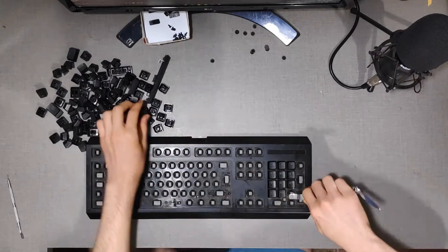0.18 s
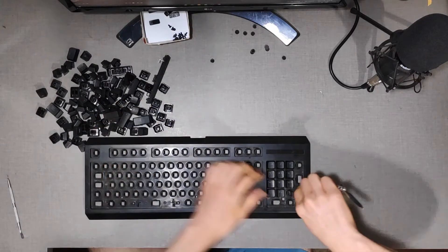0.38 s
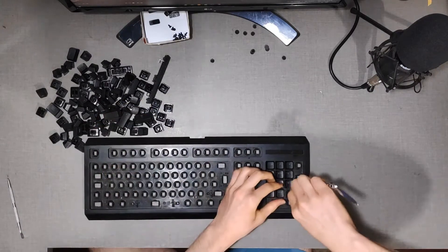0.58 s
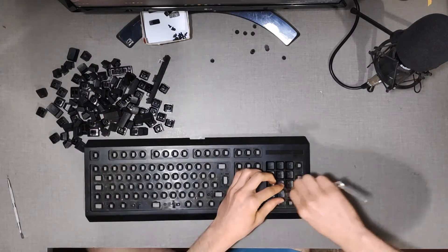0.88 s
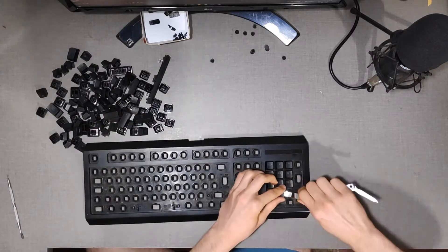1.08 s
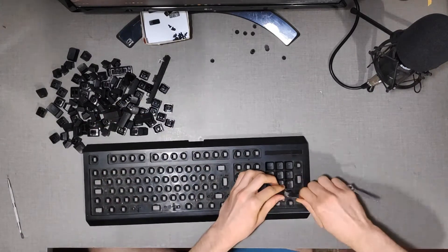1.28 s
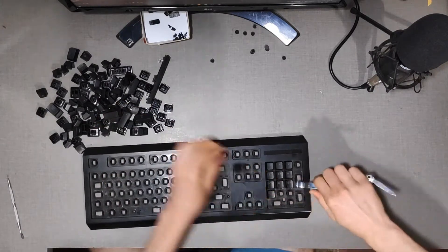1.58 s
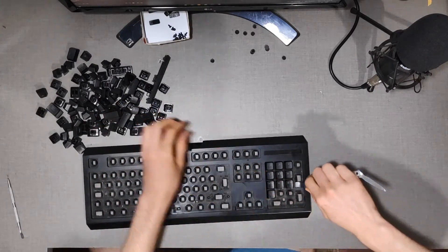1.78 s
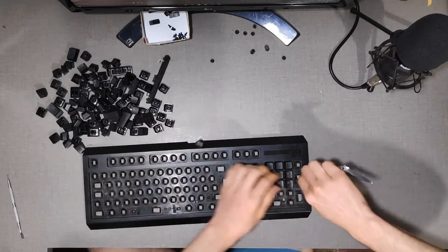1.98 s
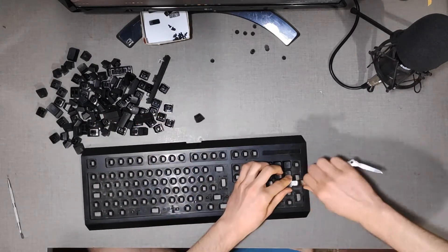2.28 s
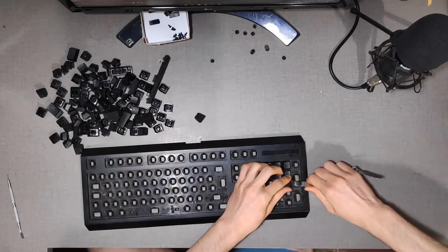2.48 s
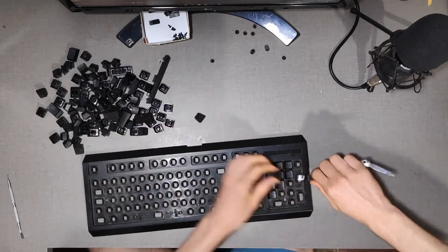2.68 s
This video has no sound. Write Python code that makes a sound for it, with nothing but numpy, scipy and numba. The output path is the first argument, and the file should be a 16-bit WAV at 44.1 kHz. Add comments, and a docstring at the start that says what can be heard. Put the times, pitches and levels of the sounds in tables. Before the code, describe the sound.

Plastic keycaps click and snap irregularly as they are pulled off a keyboard and dropped onto a loose pile. Fingers rattle the caps between pulls, and the desk thumps softly. A nearby microphone catches a small, lively room with faint hiss.

```python
"""A faint rattle and a low desk boom, then sharp clicks: plastic keycaps are prised off a keyboard
and dropped on a pile of loose caps. Each impact excites short, heavily damped plastic modes, and some
caps snap with a hollow cavity tone. Fingers rattle the pile in between; the hands drive the desk top
into resonance. The small, lively room reverberates over a steady hiss, and a two-port microphone
picks up much of it, each port with its own treble colour."""
import sys
import numpy as np
from scipy import signal
from scipy.fft import rfft, irfft, next_fast_len
from scipy.io import wavfile
from scipy.ndimage import uniform_filter1d
from numba import njit

SR = 44100
rng = np.random.default_rng(int(sys.argv[2]) if len(sys.argv) > 2 else 0)


def unload_audio(sound):
    """Save the sound as a 16-bit wav file, at the path given as the first command line argument."""
    columns = np.transpose(np.atleast_2d(sound))
    # keep every value between -1 and 1, then stretch to whole-number steps
    steps = np.round(np.clip(columns, -1, 1) * 32767)
    wavfile.write(sys.argv[1], SR, steps.astype(np.int16))


N = 125685

# Modes of a plastic cap: (frequency [Hz], relative level [dB], T60 [s])
CAP_MODES = [(462, -3, 0.0063), (680, -4.5, 0.013), (1187, 1, 0.0067), (1795, 1, 0.0056),
             (2335, 3.5, 0.0041), (3050, -4, 0.0038), (4490, 8, 0.0025), (5700, 4.5, 0.0023),
             (7460, 4, 0.0032), (8660, 6, 0.0015), (9900, 6, 0.0034), (13700, -1.5, 0.0027),
             (13200, -8, 0.0016)]


def undb(db):
    """Decibels to amplitude ratio."""
    return 10 ** (np.asarray(db) / 20)


def unit(x):
    """Scale to unit RMS."""
    return x / np.sqrt(np.mean(x ** 2))


def curves(table):
    """Interpolate each column linearly over the times in the first."""
    times, *columns = np.array(table).T
    return [np.interp(np.arange(N) / SR, times, column) for column in columns]


def colour(x, hz, db):
    """Zero-phase filter: dB points joined on a log-frequency axis."""
    size = next_fast_len(x.shape[-1])
    log_f = np.log(np.maximum(np.arange(size // 2 + 1) * SR / size, 1))
    return irfft(rfft(x, size) * undb(np.interp(log_f, np.log(hz), db)), size)[..., :x.shape[-1]]


def band(x, hz, width):
    """Second-order resonator, gain 1 at the centre."""
    return signal.lfilter(*signal.iirpeak(hz, hz / width, fs=SR), x)


def air(level_db=-62.5):
    """Stationary room hiss, partially coherent between the two ports."""
    # (frequency [Hz], relative spectral density [dB])
    spectrum = [(150, -42), (250, -9.5), (436, -18), (600, -14), (720, -13), (860, -31), (1170, -30),
                (1600, -32), (2700, -36), (7800, -34), (13200, -32), (14500, -63), (16000, -70)]
    noise = rng.standard_normal((3, N))
    return unit(colour(noise[:2] + 0.57 * noise[2], *np.array(spectrum).T)) * undb(level_db)


def room(x, gain_db=7, rise_s=0.0014, early_s=0.0024, coherent_hz=5000, low_cut_hz=262):
    """Diffuse reverberation: dense reflections build quickly and decay exponentially, band by band."""
    # (frequency [Hz], T60 [s])
    decay_times = [(310, 0.35), (1050, 0.28), (3100, 0.29), (7100, 0.26), (13100, 0.28)]
    hz = np.array(decay_times)[:, 0]
    t = np.arange(SR // 2) / SR
    f = np.arange(len(t) // 2 + 1) * SR / len(t)
    noise = rng.standard_normal((3, len(t)))
    common = 0.5 * rfft(noise[2]) / (1 + (f / coherent_hz) ** 2)  # treble is unrelated between ports
    spectrum = (rfft(noise[:2]) + common) * f ** 2 / (f ** 2 + low_cut_hz ** 2)
    share = lambda centre: np.interp(np.log(f + 1), np.log(hz), 1. * (hz == centre))
    tail = sum(irfft(spectrum * share(centre), len(t)) * undb(-60 * t / t60)
               for centre, t60 in decay_times)
    tail *= 1 - np.exp(-t / rise_s)
    tail *= 1 + undb(1) * np.exp(-t / early_s)  # early reflections off the desk and nearby things
    tail *= undb(gain_db) / np.sqrt(np.sum(tail ** 2) / 2)
    return signal.fftconvolve(x, tail, axes=1)[:, :x.shape[1]]


def heard(source, pan_db, room_db, left_delay_s=0.00009):
    """Superposition of reflections and direct sound, which reaches the right port first."""
    pair = source * undb(np.array([[pan_db], [-pan_db]]) / 2)
    direct = np.array([np.roll(pair[0], round(left_delay_s * SR)), pair[1]])
    return direct + undb(room_db) * room(pair)


def boom(modes, side_gain, even_s=0.071):
    """Resonances under random forcing, evened in strength, as a mid and a side signal."""
    def vibration():
        x = unit(sum(undb(db) * unit(band(band(rng.standard_normal(N), hz, width), hz, 2 * width))
                     for hz, width, db in modes))
        return x / np.sqrt(uniform_filter1d(x ** 2, int(even_s * SR)) + 0.078)
    return vibration() + side_gain * vibration() * np.array([[1], [-1]])


def desk(rumble_hz=44.4, rumble_db=-48.5, rumble_follow=0.57):
    """Forced vibration: uneven hand pressure drives desk top and keyboard case, over a faint rumble."""
    # Response to the hands: (time [s], deep boom [dB], upper boom [dB], case [dB])
    pressure = [(0.0, -40, -36, -47), (0.08, -39, -64, -87), (0.1, -44.5, -43, -85), (0.2, -37.5, -50, -63),
                (0.25, -38, -43.5, -52), (0.3, -46.5, -49.5, -63.5), (0.57, -37, -43.5, -45.5),
                (0.6, -29, -33.5, -27), (0.67, -22, -31, -41), (0.78, -35, -42.5, -42.5),
                (0.86, -35, -40.5, -32), (0.9, -38, -43, -53), (1.0, -42, -48, -52),
                (1.05, -38.5, -40.5, -55), (1.09, -59, -46, -45), (1.13, -37, -42.5, -51.5),
                (1.32, -39, -51, -73), (1.36, -38, -44, -28), (1.4, -37.5, -38.5, -42.5),
                (1.52, -43.5, -46, -49.5), (1.54, -46, -42, -38), (1.71, -43.5, -49, -61),
                (1.75, -51.5, -43, -42.5), (1.99, -61, -65, -57), (2.1, -33.5, -41, -46.5),
                (2.23, -50, -44.5, -41.5), (2.47, -39, -46, -58.5), (2.57, -50, -38, -32),
                (2.67, -40, -51, -59.5), (2.72, -39.5, -46.5, -51), (2.77, -60, -51.5, -61),
                (2.85, -43, -52, -72)]
    # Modes of desk top and case: (frequency [Hz], resonator bandwidth [Hz], relative level [dB])
    deep_modes = [(64.2, 2.3, -3), (97.2, 6.6, 13.5)]
    upper_modes = [(125, 12.5, -2.5), (162, 23, -2), (190.6, 27.6, -5)]
    case_modes = [(274.7, 29.5, 3.5), (442, 92, -9)]
    deep_db, upper_db, case_db = curves(pressure)
    swing_db = rumble_follow * (deep_db - deep_db.mean())
    rumble = boom([(rumble_hz, 16, 0)], side_gain=0.26) * undb(rumble_db + swing_db)
    deep = boom(deep_modes, side_gain=0.034) * undb(deep_db)
    upper = boom(upper_modes, side_gain=0.48) * undb(upper_db)
    case = boom(case_modes, side_gain=0.22) * undb(case_db)
    return rumble + deep + upper + case


@njit
def ring(out, start, hz, t60, gain):
    """Damped free vibration: add one decaying sine for each strike of a mode."""
    for k in range(len(start)):
        pole = np.exp(2j * np.pi * hz[k] / SR - np.log(1000) / (t60[k] * SR))
        phasor = gain[k] + 0j
        for i in range(start[k], min(start[k] + int(t60[k] * SR), len(out))):
            out[i] += phasor.imag
            phasor *= pole
    return out


def strike(times, db, size=N, pitch_spread=0.13):
    """Modal superposition: each impact rings randomly detuned cap modes; db is per strike and mode."""
    hz, mode_db, t60 = np.array(CAP_MODES).T
    chance = rng.standard_normal((len(times), 3, len(hz)))
    pitch = np.minimum(hz * np.exp(pitch_spread * chance[:, 0]), .45 * SR)
    gain = undb(db + mode_db + 1.2 * chance[:, 1]) * np.sign(chance[:, 2])
    start = np.repeat((times * SR).astype(np.int64), len(hz))
    return ring(np.zeros(size), start, pitch.ravel(), np.tile(t60, len(times)), gain.ravel())


def rattle(ticks_per_s=1400, gain_db=-7):
    """Shot noise: fingers stir the caps into dense, random collisions of uneven size."""
    # Stirring of the pile: (time [s], level [dB], spectral tilt [dB/octave])
    fingers = [(0, -43.5, -5.5), (.03, -88, 4), (.21, -88, 9), (.25, -42, -7.5), (.34, -33.5, 2.5),
               (.41, -37, -5), (.47, -55, -8), (.52, -36, -3), (.565, -30, 0), (.585, -15, -3),
               (.63, -30.5, -6.5), (.68, -33, -4), (.72, -47, 3.5), (.85, -54, -9), (.98, -46.5, 1.5),
               (1.06, -41.5, -4.5), (1.18, -43, -1), (1.28, -44, 4), (1.34, -53, -6.5), (1.48, -44, -4.5),
               (1.54, -38.5, -6.5), (1.62, -60, 3.5), (1.8, -63.5, 3), (1.89, -34.5, -2.5),
               (1.95, -29.5, 0.5), (2.06, -33.5, -1.5), (2.11, -38, -4), (2.19, -26, -0.5), (2.28, -36, -3),
               (2.41, -32, 1), (2.6, -60, -9), (2.69, -41.5, 1), (2.75, -41, -1), (2.8, -57, -1.5),
               (2.85, -93, -15)]
    level_db, tilt = curves(fingers)
    chance = rng.random((int(ticks_per_s * N / SR), 2))
    at = (chance[:, 0] * (N - 1)).astype(int)
    size_db = np.minimum(-np.log(1 - chance[:, 1]), 13)
    tilt_db = tilt[at, None] * np.log2(np.array(CAP_MODES)[:, 0] / 3000)
    ticks = unit(strike(at / SR, size_db[:, None] + tilt_db))
    return heard(ticks * undb(level_db + gain_db), pan_db=0, room_db=0)


def snaps(crack_hz=7700, crack_t60_s=0.0035, hollow_t60_s=0.027):
    """Cavity resonance: a cap snaps free or lands on edge with a crack and a close pair of tones."""
    # (time [s], crack level [dB], cavity pitch [Hz], cavity level [dB], left minus right [dB])
    events = [(0.247, -16, 1500, -48, 2), (0.3292, -26, 1930, -45, -2), (0.3917, -13.5, 1930, -48, -8),
              (0.800, -30, 2050, -22.5, 7), (1.032, -31, 1060, -24.5, -4), (1.2155, -43, 1380, -37, 4),
              (1.252, -37, 1250, -32, 1), (1.349, -18, 1776, -21, 0), (1.3601, -16, 1746, -17, 6),
              (1.7401, -28, 1370, -21.5, -6), (1.8367, -18, 1500, -44, 3), (1.919, -13, 1703, -34.5, 2),
              (2.2725, -26, 2030, -34, -2), (2.3285, -24, 1940, -40, 2), (2.4263, -17.5, 2094, -14, 0.5),
              (2.513, -30, 1784, -12.5, 0), (2.733, -66, 2090, -41, -2), (2.745, -56, 2220, -38, 8)]
    t = np.arange(SR // 2) / SR
    tone = lambda hz: np.sin(2 * np.pi * hz * t)
    crack = tone(crack_hz) + 0.5 * tone(crack_hz * 0.61) + 0.5 * tone(crack_hz * 1.65)
    crack *= undb(-60 * t / crack_t60_s)
    out = np.zeros((2, N + SR))
    for time, crack_db, hz, hollow_db, pan_db in events:
        hollow = (tone(hz) + 0.39 * tone(hz * 1.12)) * undb(-60 * t / hollow_t60_s)
        snap = undb(crack_db) * crack + undb(hollow_db) * hollow
        at = int(time * SR)
        out[:, at:at + SR // 2] += heard(snap, pan_db, room_db=-11.5)
    return out[:, :N]


def clicks(contacts=6, gain_db=5, rebound_db=-3.5, first_touch_db=-3):
    """Inelastic impact: a contact and quick, weakening rebounds; each spot has its own reflections."""
    # Impacts of caps and tool: (time [s], level [dB], offsets of body, low ring, mid ring,
    # bright ring and top [dB], left minus right [dB], mean rebound gap [ms], room send [dB])
    impacts = [(0.16, -50, -34, -18, -18, -8.5, -29, -4, 1.37, 7.5),
               (0.2224, -18.5, -18.5, -33, -18.5, -12, -13.5, -4, 1.3, -1),
               (0.231, -28, -15.5, -17, -23, -4, -21, 1, 1.4, 1.5),
               (0.2463, -20, -16, -22, -21, -14, -14.5, 10, 1.28, -3),
               (0.2807, -26.5, -26, -25, -16, -8, -25, -4.5, 1.17, 1),
               (0.3158, -23.5, -13, -30, -16, -15, -15, 9, 1.1, -4),
               (0.328, -19, -24, -14, -10.5, -11.5, -13.5, -2.5, 1, -4),
               (0.3548, -13.5, -18, -20, -25, -6.5, -28, -1, 1.24, -2.5),
               (0.3599, -11.5, -27, -22, -12.5, -7.5, -31, -1, 1.2, -7),
               (0.3918, -15, -33, -27, -12, -12, -18, 4.5, 1.1, -4.5),
               (0.4186, -28.5, -30, -3.5, -16, -31, -26, 3.5, 1.25, -2),
               (0.4848, -29.5, -4, -12, -17, -18, -30, 3.5, 0.96, 1),
               (0.529, -14, -20, -26, -18.5, -7.5, -17, -7, 1.45, -9.5),
               (0.5414, -17.5, -31, -28, -32, -8.5, -21, 4, 1.4, -7),
               (0.5526, -22.5, -29, -12.5, -12.5, -4.5, -20, -0.5, 1.2, 1),
               (0.6097, -12.5, -14, -15.5, -10.5, -14.5, -35, 3, 1.35, -4),
               (0.6653, -18.5, -9, -7.5, -15, -27, -36, 5, 1.23, -7),
               (0.7543, -19.5, -24, -15, -12.5, -16.5, -19, 1.5, 1.17, 0),
               (0.7977, -15, -22, -10.5, -12.5, -11, -17, 0, 1.36, 1.5),
               (0.8183, -21, -19, -13, -6.5, -16, -6.5, 17, 1.67, -11),
               (0.8365, -22.5, -23, -7, -12, -12, -22, 1, 0.96, -9),
               (1.0045, -36.5, -7, -7.5, -19.5, -14, -22, 1.5, 1.04, 6),
               (1.0311, -20.5, -18, -14.5, -21.5, -18, -29, 1.5, 1.07, 5),
               (1.2148, -22, -46, -13, -13.5, -16.5, -32, 0.5, 1.53, 1.5),
               (1.269, -27, -13.5, -9.5, -15.5, -14, -28, 2, 1.2, -4),
               (1.3487, -7.5, -19.5, -18, -14, -13.5, -17.5, -0.5, 1.62, 0),
               (1.358, -12, -14.5, -16.5, -15, -20, -16, -0.5, 1.59, 2.5),
               (1.3718, -20.5, -13.5, -10.5, -7.5, -7, -9, 9, 1.23, 0),
               (1.5329, -32.5, -9, -4, -23, -17, -37, 2, 1.62, -4),
               (1.7387, -8.5, -13.5, -17, -18.5, -12.5, -16.5, 1.5, 1.17, 1.5),
               (1.8351, -13, -19, -17, -23, -6.5, -9.5, 0, 1.24, -2),
               (1.8615, -18.5, -23, -15, -11.5, -13, -14, 1, 1.3, -2.5),
               (1.872, -16.5, -42, -26, -22.5, -14, -9.5, 2, 1.1, -1.5),
               (1.916, -16.5, -21, -22, -21, -9, -15, -1.5, 1.19, 2),
               (1.967, -10, -22, -30, -14.5, -4.5, -6, 2, 1.26, -3.5),
               (1.977, -21, -24, -34, -13, -7, -18, 6, 1.3, -2),
               (2.058, -22.5, -7.5, -7.5, -15, -23, -32, 4, 1.22, -4),
               (2.1153, -23, -21, -15, -16, -4, -13, -8.5, 1.36, 1),
               (2.1222, -18, -23, -21, -11, -23, -15.5, 2.5, 1.46, -2),
               (2.1542, -18.5, -22.5, -15.5, -18.5, -19, -20, 3, 1.49, 2.5),
               (2.2491, -19, -32, -24.5, -12, -14, -16.5, -1, 1.1, -2.5),
               (2.2723, -19, -35, -17, -16, -15, -21, 3, 1.56, 1),
               (2.3287, -20, -17.5, -33, -19.5, -15, -26, 2, 1.56, 3),
               (2.4263, -10.5, -40, -20, -12.5, -14, -18, 2, 1.33, -1),
               (2.5128, -12, -25, -17, -13, -18, -20, 0.5, 1.16, 0),
               (2.5283, -13.5, -12.5, -51, -9.5, -12.5, -7.5, 2.5, 1.42, -1)]
    # For each cap mode: (column of impacts that holds its offset [index])
    offset_column = [2, 2, 2, 3, 3, 4, 4, 4, 5, 5, 6, 6, 6]
    rows = np.array(impacts)
    mode_db = rows[:, 1:2] + rows[:, offset_column] + gain_db
    times, pan_db, gap_ms, room_db = rows[:, [0, 7, 8, 9]].T
    gaps = gap_ms[:, None] / 1000 * (.25 + 1.5 * rng.random((len(rows), contacts)))
    delays = np.cumsum(gaps, axis=1) - gaps[:, :1]
    contact_db = rebound_db * np.arange(contacts)
    contact_db[0] += first_touch_db
    out = np.zeros((2, N + SR))
    for k, time in enumerate(times):
        click = strike(delays[k], mode_db[k] + contact_db[:, None], size=SR // 2)
        at = int(time * SR)
        out[:, at:at + SR // 2] += heard(click, pan_db[k], room_db[k])
    return out[:, :N]


def scene():
    """Linear superposition: reverberant clicks, snaps and rattle over desk boom and hiss."""
    return clicks() + snaps() + rattle() + desk() + air()


def record(dry, cutoff_hz=16500):
    """Filtering: left and right have their own treble colour; treble above about 16 kHz is cut off."""
    # (frequency [Hz], left gain [dB], right gain [dB])
    side_gains = [(222, -0.5, -0.5), (1050, -3.5, -2), (2670, 2, 4), (4350, 1, 3), (7970, -2.5, 6.5),
                  (9250, -4.5, -3), (12930, 4, -2), (15000, -2.5, -1.5), (16100, -29, -19)]
    hz, left_db, right_db = np.array(side_gains).T
    coloured = np.array([colour(dry[0], hz, left_db), colour(dry[1], hz, right_db)])
    return signal.sosfilt(signal.ellip(10, .2, 80, cutoff_hz, fs=SR, output="sos"), coloured)


dry = scene()
out = record(dry)
unload_audio(out)
```